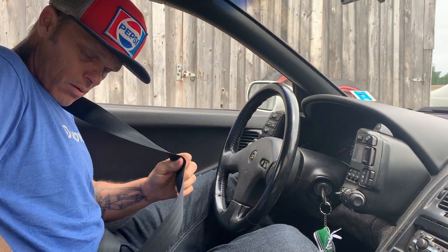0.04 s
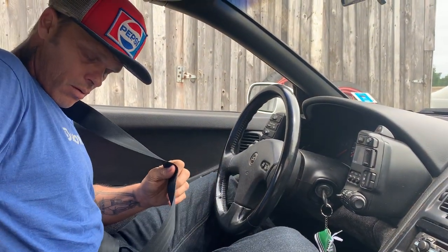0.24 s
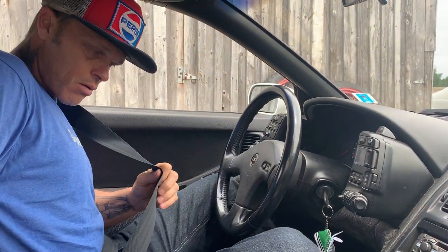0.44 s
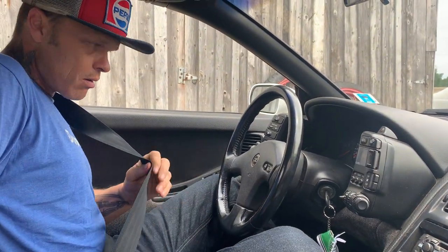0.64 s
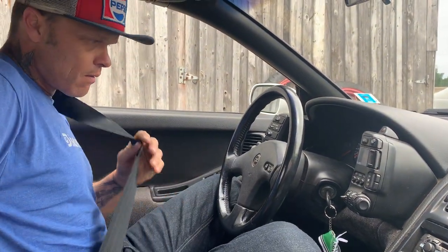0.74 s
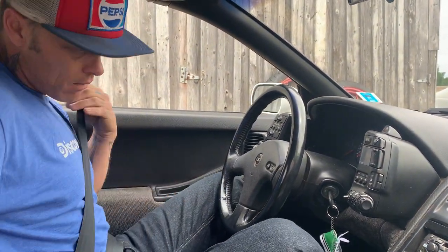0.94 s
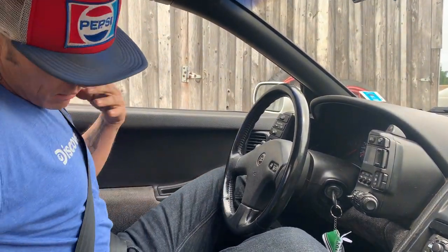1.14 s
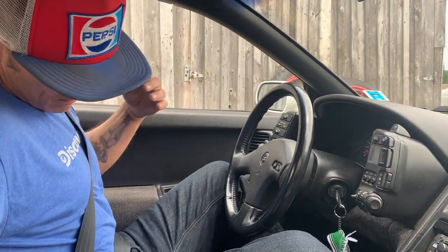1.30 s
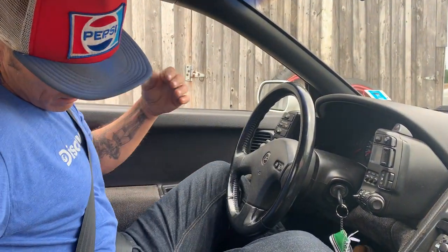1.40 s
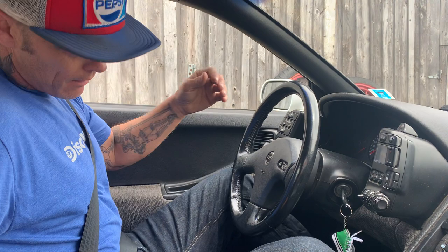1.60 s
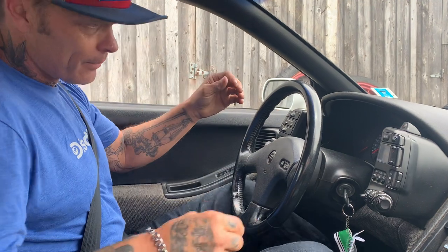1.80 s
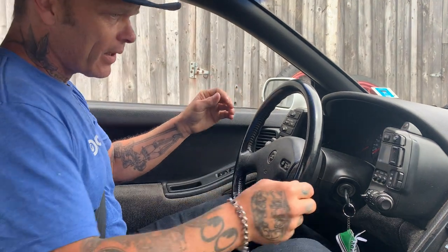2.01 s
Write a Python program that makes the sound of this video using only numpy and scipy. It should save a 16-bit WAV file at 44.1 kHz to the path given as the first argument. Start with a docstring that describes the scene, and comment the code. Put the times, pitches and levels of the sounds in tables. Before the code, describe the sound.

A seatbelt tongue knocks lightly against a plastic buckle, then snaps in with a bright, loud metallic click; soft reel ticks and cloth rustle follow over low seat thumps, heard close in a small, dry car cabin.

```python
"""A car seat thumps and rumbles under a driver while belt webbing hisses over his shirt, in a parked car.
He feeds the belt tongue into its buckle: hollow knocks, then a sharp latch click and soft reel ratchet ticks.
Rumble and hiss are shaped noise, thumps are sagging sines, and short noise contacts excite plastic and steel.
A phone close by hears a small, dry cabin: its two ports are drawn together in the bass, and from the upper
treble they share one sound, the first port lagging the second."""
import sys
import numpy as np
from scipy import signal
from scipy.fft import rfft, irfft
from scipy.io import wavfile
from scipy.ndimage import uniform_filter1d

SR = 44100
rng = np.random.default_rng(int(sys.argv[2]) if len(sys.argv) > 2 else 0)


def decibels_to_gain(level_db):
    """Convert a level in decibels to a linear amplitude gain (20 dB per decade)."""
    exponent = np.asarray(level_db, float) / 20
    return 10 ** exponent


def wrap_up_sound(samples):
    """Save the sound to the file named by the first command line argument, as 16-bit audio."""
    columns = np.atleast_2d(samples).T
    # keep every value between -1 and 1, then stretch to whole-number steps
    tamed = np.clip(columns, -1, 1)
    steps = np.round(tamed * 32767).astype(np.int16)
    wavfile.write(sys.argv[1], SR, steps)


N = 90493

# Levels in the tables are mix levels ahead of the port gains, unless called relative.
# cabin air, noise spectrum: pitch_hz, relative level_db
AIR_SPECTRUM = [(30, -5.5), (80, 7.5), (200, -2.5), (500, -12.5), (900, -6), (1600, -15), (3000, -25.5),
                (7000, -28.5), (16000, -14)]
# seat foam and body rumbling: start_s, level_db, brightness_db (gain above 200 Hz)
SEAT_MOVES = [(0, -57.5, 7), (.07, -51.5, -10.5), (.15, -60, 4.5), (.22, -45, -11), (.31, -60.5, 10.5),
              (.4, -48.5, 0.5), (.5, -48.5, 3), (.56, -49, -1.5), (.64, -55.5, -15), (.68, -51.5, 3.5),
              (.75, -51.5, -8.5), (.86, -47, -3.5), (.95, -47, -0.5), (1.14, -48.5, 5.5),
              (1.22, -48.5, -12.5), (1.4, -60, 1), (1.55, -57.5, -5), (1.6, -63.5, -7), (1.66, -73, 14),
              (1.72, -56, -3), (1.9, -56, -10), (1.97, -55.5, 5), (2.05, -54.5, 8)]
# foam rumble, noise spectrum: pitch_hz, relative level_db
FOAM_SPECTRUM = [(25, -18), (45, -1), (70, 2), (130, -4.5), (200, -7.5), (320, -13.5), (600, -35),
                 (1200, -46)]
# seat thumps: start_s, level_db, start_pitch_hz, end_pitch_hz, t60_s
SEAT_THUMPS = [(0.014, -27.5, 172, 94, 0.05), (0.18, -31, 205, 93, 0.07), (0.203, -33.5, 90, 49, 0.086),
               (.297, -43.5, 252.5, 166.6, 0.082), (0.341, -34, 230, 180, .1),
               (0.374, -31.5, 207.7, 160, 0.084), (0.414, -34, 122.4, 50, 0.16),
               (0.511, -27, 205, 120, 0.036), (0.548, -36.5, 68.5, 52.4, 0.4), (0.7858, -28.5, 215, 60, .2),
               (0.876, -36, 90, 75, 0.135), (1.215, -43.5, 120, 61.5, 0.11), (1.454, -37, 150, 82.4, .14),
               (1.707, -42, 150, 102, 0.078), (1.789, -49, 170, 109, 0.095),
               (1.935, -42.5, 170, 110.7, 0.085)]
# webbing sliding on cloth: start_s, level_db, treble_tilt_db (gain above 7500 Hz)
WEBBING_SLIDE = [(0, -57, -0.5), (.04, -62.5, 0.5), (.14, -58.5, 6.5), (.2, -62.5, 7.5), (.26, -64, -16),
                 (.32, -63, -3), (.4, -60, -29), (.435, -77, -14), (.48, -55, -12), (.56, -63, 9),
                 (.64, -72, -3), (.68, -68.5, 16), (.72, -55, 12.5), (.79, -62, 3.5), (.82, -58.5, 5),
                 (.88, -54, 5.5), (1.08, -57.5, 8), (1.15, -55.5, -5), (1.3, -58.5, 6.5), (1.39, -59.5, 1),
                 (1.48, -77, -13.5), (1.6, -76, 5), (1.8, -72, 3), (1.9, -67.5, 0.5), (1.97, -60.5, -23),
                 (2.05, -59, -32)]
# cloth hiss, noise spectrum: pitch_hz, relative level_db
CLOTH_SPECTRUM = [(300, -27), (700, -3), (1500, 4), (3000, 2), (6000, -4), (9000, -4.5), (13000, -5.5),
                  (16000, -7)]
# one faint narrow squeak: start_s, end_s, pitch_hz, width_hz, level_db
FAINT_SQUEAK = (1.53, 1.69, 1560, 90, -79)
# tongue and belt knocking on plastic: start_s, relative shell_db, shell_pitch_hz,
# relative metal_db, contact_ms (decay constant)
PLASTIC_KNOCKS = [(0.164, -48.5, 1070, -34.5, 3.24), (.172, -54.5, 4560, -58, 1),
                  (0.211, -43.5, 1440, -56, 3.4), (0.266, -52.5, 1610, -82, 2.6),
                  (0.288, -37.5, 1404, -46, 2.8), (0.297, -38, 556, -74.5, 3.),
                  (.329, -53.5, 970, -70, 1.4), (.338, -41, 1900, -53, 1.8), (.354, -42, 1083, -49.5, 4.8),
                  (0.369, -49, 2490, -52.5, 3.), (0.384, -40, 1010, -59, 4), (0.396, -44, 1950, -63.5, 2.2),
                  (0.444, -52.5, 3860, -73.5, 2.5), (.456, -39, 985, -73, 4.5),
                  (0.4668, -62.5, 2020, -40, 1), (.670, -49.5, 1900, -56.5, 2.4),
                  (.738, -42.5, 1016, -45.5, 3.8), (.748, -48.5, 1130, -74, 3.),
                  (.767, -38.5, 4710, -42, 2.4), (0.776, -62, 6500, -61, 5.5)]
# dull scuff in each knock: pitch_hz, gain_db
SCUFF_TONE = [(150, -18), (400, -6.5), (1000, 7), (3000, -4), (6000, -29), (12000, -47)]
# reel ratchet ticks: start_s, relative level_db, pitch_hz
REEL_TICKS = [(.911, -34.5, 580), (0.942, -50, 1110), (0.947, -34, 600), (.977, -45, 645),
              (1.019, -35, 560), (1.055, -38, 600), (1.08, -40.5, 840), (1.122, -35, 600), (1.14, -49, 810),
              (1.269, -46.5, 950)]
# latch click, after a faint soft noise that leads into it: start_s, relative level_db,
# noise_ms (decay constant)
LATCH_CLICK = [(.4875, -38.5, 12), (0.4975, -11, 1.64), (.4991, -12, 0.71), (0.5017, -12, 0.62),
               (.506, -29.5, 1.1), (.511, -27.5, 1.7), (.526, -37, 1.7)]
# crack of the latch click: pitch_hz, relative gain_db
CRACK_TONE = [(300, -22.5), (1150, -19), (1700, 7.5), (3500, -7), (6500, -3), (8000, -5.5), (11000, -2),
              (15000, 4), (17000, -9)]
# light metal contact in the knocks: pitch_hz, relative gain_db
METAL_TICK_TONE = [(500, -13), (1500, -18), (3200, 3), (6500, -1.5), (11000, 1), (16000, -2)]
# ringing modes of buckle steel and shell: pitch_hz, relative level_db, t60_s
BUCKLE_MODES = [(436, -11.5, 0.11), (567, -8.5, 0.063), (1467.5, -6.5, 0.096), (1557, 0.5, 0.094),
                (1595, -2, 0.028), (1900, -15, 0.024), (2040, -7.5, .03), (2568, -13.5, 0.043),
                (3690, -10, 0.019), (4420, -9.5, 0.065), (4894, -15.5, 0.084), (6260, -8.5, 0.017),
                (6620, -2.5, 0.011), (7470, -21, .03), (9310, -22, 0.0099), (10790, -12, 0.014),
                (11700, -12.5, 0.015), (15300, 5, 0.0072)]
# upholstery dulls the echoes: pitch_hz, gain_db
ECHO_TONE = [(300, 0.5), (3000, 3), (16000, -5)]


def unit(x):
    """Scale to rms 1."""
    return x / np.sqrt(np.mean(x ** 2))


def colour(x, points):
    """Shape a spectrum by pitch_hz, gain_db points, joined on a log pitch scale."""
    points = np.array(points, float)
    hz = np.fft.rfftfreq(x.shape[-1], 1 / SR) + 1  # 1 Hz up keeps the log finite
    gain_db = np.interp(np.log(hz), np.log(points[:, 0]), points[:, 1])
    return irfft(rfft(x) * decibels_to_gain(gain_db), x.shape[-1])


def curve(table, size):
    """Join the points of a time table into curves, one value a sample for each column."""
    points = np.array(table, float)
    t = np.arange(N) / SR
    return [np.interp(t, points[:, 0], points[:, k]) for k in range(1, size + 1)]


def split(x, hz):
    """Split into low and high parts that add back to the whole."""
    low = signal.sosfiltfilt(signal.butter(2, hz, fs=SR, output="sos"), x)
    return low, x - low


def walk(rate):
    """Wander between random levels drawn rate times a second; spread 1."""
    hold = int(SR / rate)
    levels = np.repeat(rng.standard_normal(N // hold + 1), hold)
    return unit(uniform_filter1d(levels, hold)[:N])


def add(out, start_s, x):
    """Mix x into out from start_s."""
    i = int(start_s * SR)
    out[i:i + len(x)] += x[:N - i]


def decay(t, t60_s):
    """Fall by 60 dB in t60_s."""
    return np.exp(-np.log(1000) * t / t60_s)


def contact(ms):
    """A sharp first touch, then rough noise that dies away; the energy follows the length."""
    t = np.arange(2048) / SR
    touch_share = 0.22  # of the energy, in the first instant
    rough = rng.standard_normal(len(t)) * np.exp(-t * 1000 / ms)
    rough = rough / np.sqrt(np.sum(rough ** 2))
    x = np.sqrt(1 - touch_share) * rough + np.sqrt(touch_share) * (t == 0)
    return x * np.sqrt(ms * SR / 2000)


def ring(x, hz, q):
    """One resonance, with gain made up for its narrow band."""
    return signal.lfilter(*signal.iirpeak(hz, q, fs=SR), x) * np.sqrt(q * SR / (4 * hz))


def cabin_air():
    """Faint steady cabin noise, unrelated at the two ports."""
    return decibels_to_gain(-66.5) * unit(colour(rng.standard_normal((2, N)), AIR_SPECTRUM))


def seat_rumble():
    """Foam rubs as restless low noise; random grains through a broad resonance crackle like a seat cover."""
    level_db, bright_db = curve(SEAT_MOVES, size=2)
    low, high = split(unit(colour(rng.standard_normal(N), FOAM_SPECTRUM)), 200)
    low = low * decibels_to_gain(1.65 * walk(16))
    high = high * decibels_to_gain(bright_db + 2.0 * walk(29.93))
    creaks_per_s, creak_hz, creak_q = 250, 480, 1.1
    creak_db = -17  # relative to the level and brightness curves together
    grains = (rng.random(N) < creaks_per_s / SR) * decibels_to_gain(3.9 * rng.exponential(size=N))
    creaks = unit(ring(ring(grains, creak_hz, creak_q), creak_hz, creak_q))
    return decibels_to_gain(level_db) * (low + high) + decibels_to_gain(level_db + bright_db + creak_db) * creaks


def seat_thumps():
    """Each thump is a decaying sine with a soft onset whose pitch sags."""
    out, t = np.zeros(N), np.arange(SR // 2) / SR
    glide_s, rise_s = 0.01, 0.0045  # time constants
    for start_s, level_db, start_hz, end_hz, t60_s in SEAT_THUMPS:
        turns = end_hz * t + (start_hz - end_hz) * glide_s * (1 - np.exp(-t / glide_s))
        envelope = (1 - np.exp(-t / rise_s)) * decay(t, t60_s)
        add(out, start_s, -decibels_to_gain(level_db) * envelope * np.sin(2 * np.pi * turns))
    return out


def webbing():
    """Cloth hiss with sparse fibre snags, from two unrelated patches, one a port."""
    level_db, tilt_db = curve(WEBBING_SLIDE, size=2)
    fibres_per_s, fibre_spread_db = 4300, 0.6
    fibre_db = -17.5  # relative to the hiss, before colouring
    size = (2, N)
    snags = (rng.random(size) < fibres_per_s / SR) * decibels_to_gain(fibre_spread_db * rng.exponential(size=size))
    snags = snags * rng.standard_normal(size)
    hiss = rng.standard_normal(size) + decibels_to_gain(fibre_db) * unit(snags)
    low, high = split(unit(colour(hiss, CLOTH_SPECTRUM)), 7500)
    return decibels_to_gain(level_db + 0.6 * walk(18)) * (low * decibels_to_gain(0.7 * walk(40)) + high * decibels_to_gain(tilt_db))


def squeak():
    """A thin band of noise that swells and fades once."""
    start_s, end_s, hz, width_hz, level_db = FAINT_SQUEAK
    progress = np.clip((np.arange(N) / SR - start_s) / (end_s - start_s), 0, 1)
    band = unit(ring(rng.standard_normal(N), hz, hz / width_hz))
    return decibels_to_gain(level_db) * np.sin(np.pi * progress) * band


def reel_ratchet():
    """A short contact through two equal broad resonances makes each dull reel tick."""
    out = np.zeros(N)
    contact_ms, q = 3.5, 0.8
    for start_s, level_db, hz in REEL_TICKS:
        tick = ring(ring(contact(contact_ms), hz, q), hz, q)
        add(out, start_s, decibels_to_gain(level_db) * tick / np.sqrt(SR / hz / 3))  # evens out the doubled gain
    return out


def plastic_knocks():
    """Each contact rings one hollow shell resonance, with a scuff twice as long beside it."""
    out = np.zeros(N)
    shell_q, scuff_db = 19, -2
    for start_s, shell_db, hz, _, ms in PLASTIC_KNOCKS:
        shell = ring(contact(ms), hz, shell_q)
        scuff = decibels_to_gain(scuff_db) * colour(contact(2 * ms), SCUFF_TONE)
        add(out, start_s, decibels_to_gain(shell_db) * (shell + scuff))
    return out


def buckle():
    """The latch click, its faint lead-in and the knocks' metal part: a direct crack plus ringing modes."""
    click, ticks, t = np.zeros(N), np.zeros(N), np.arange(6000) / SR
    for start_s, level_db, ms in LATCH_CLICK:
        add(click, start_s, decibels_to_gain(level_db) * contact(ms))
    for start_s, _, _, metal_db, ms in PLASTIC_KNOCKS:
        add(ticks, start_s, decibels_to_gain(metal_db) * contact(ms))
    modes = np.zeros(len(t))
    for hz, level_db, t60_s in BUCKLE_MODES:
        modes += decibels_to_gain(level_db) * np.sin(2 * np.pi * hz * t) * decay(t, t60_s)
    modes = modes / np.sqrt(np.sum(modes ** 2))
    crack_db, click_ring_db, tick_ring_db = 2.5, -4.5, -13
    excitation = decibels_to_gain(click_ring_db) * click + decibels_to_gain(tick_ring_db) * ticks
    ringing = signal.fftconvolve(excitation, modes)[:N]
    crack = colour(click, CRACK_TONE) + colour(ticks, METAL_TICK_TONE)
    return decibels_to_gain(crack_db) * crack + ringing


def cabin(x):
    """Short decaying noise stands for the cabin's dense echoes, separate at each port."""
    t = np.arange(5000) / SR
    t60_s, echo_db = 0.059, -3
    echoes = colour(rng.standard_normal((2, len(t))), ECHO_TONE) * decay(t, t60_s)
    echoes = decibels_to_gain(echo_db) * echoes / np.sqrt(np.sum(echoes ** 2, axis=1, keepdims=True))
    return signal.fftconvolve(x[None], echoes, axes=1)[:, :N]


def scene():
    """Hard sounds reach the second port later and softer; all but hiss, air and deep seat bass echo."""
    air = cabin_air()
    soft = seat_rumble() + seat_thumps()
    cloth = webbing()
    hard = squeak() + reel_ratchet() + plastic_knocks() + buckle()
    wet = cabin(hard + split(soft, 350)[1])
    port_lag = 12  # samples
    direct = np.array([0.84 * hard, 0.71 * np.roll(hard, port_lag)])
    sway = decibels_to_gain(-14) * np.array([walk(40), walk(40)])  # the seat level wanders apart at the ports
    return direct + soft * (1 + sway) + wet + air + cloth


def band_limit(x):
    """A steep low-pass at the top of the band."""
    return signal.sosfilt(signal.butter(12, 16990, fs=SR, output="sos"), x)


def record(dry):
    """The ports draw together in the bass, share one treble with a lag between them, and lose the top."""
    hz, spectrum = np.fft.rfftfreq(N, 1 / SR), rfft(dry)
    middle = spectrum.mean(0)
    width = np.clip(hz / 140, 0.6, 1)  # narrowed below 140 Hz
    spectrum = middle + width * (spectrum - middle)
    share = np.clip((hz - 5950) / 1590, 0, 1)  # fades to one shared treble above 5950 Hz
    # The ports are in phase at 6000 Hz and drift one turn apart every 5000 Hz, up to 15900 Hz.
    half_turn = np.exp(1j * np.pi * (np.minimum(hz, 15900) - 6000) / 5000)
    shared = spectrum[0] * np.array([1 / half_turn, half_turn])
    spectrum = np.sqrt(1 - share) * spectrum + np.sqrt(share) * shared
    spectrum = spectrum * decibels_to_gain(-np.clip((hz - 15950) / 10, 0, 26))  # 26 dB down from 16210 Hz
    return band_limit(irfft(spectrum, N))


dry = scene()
out = record(dry)
wrap_up_sound(out)
```